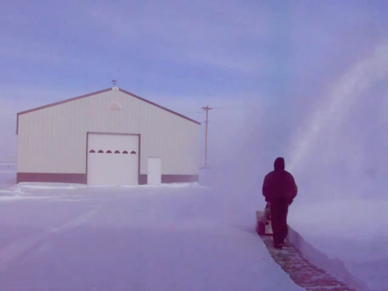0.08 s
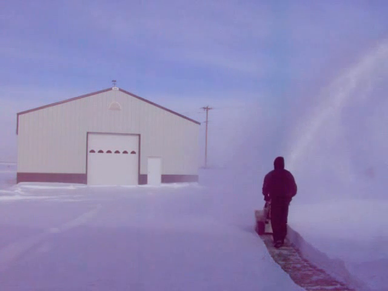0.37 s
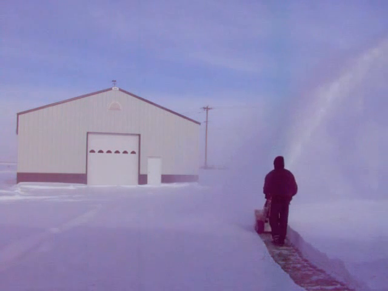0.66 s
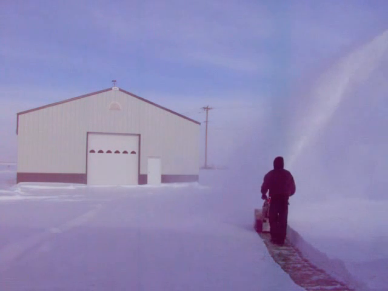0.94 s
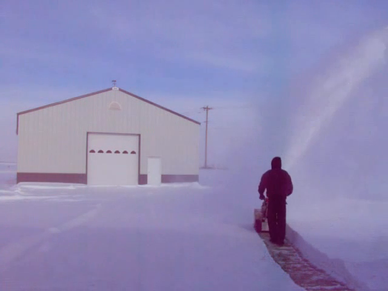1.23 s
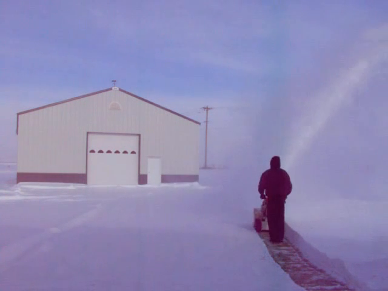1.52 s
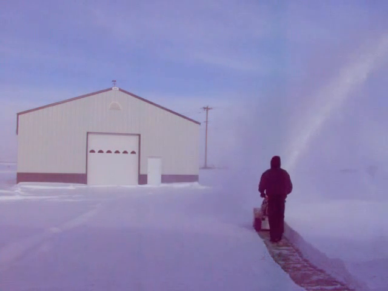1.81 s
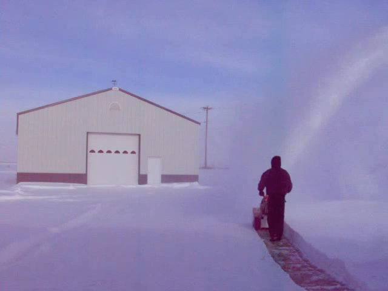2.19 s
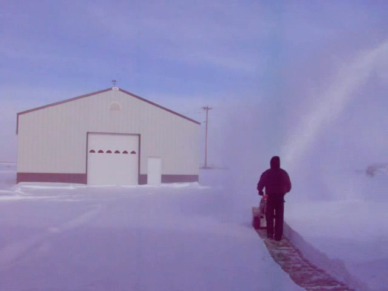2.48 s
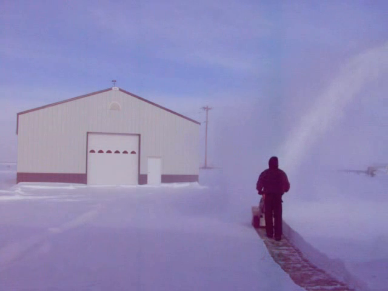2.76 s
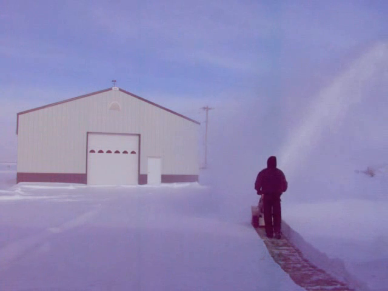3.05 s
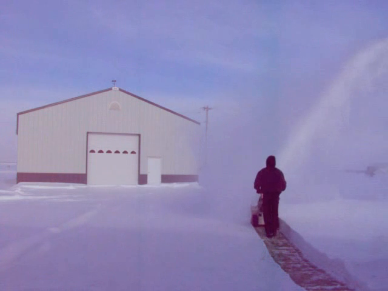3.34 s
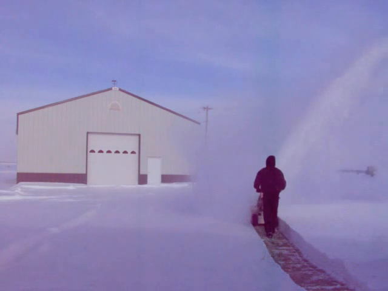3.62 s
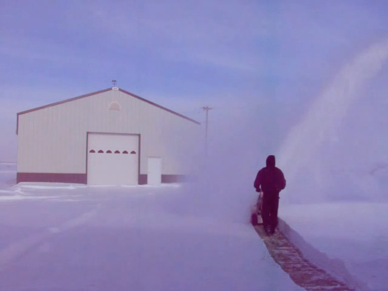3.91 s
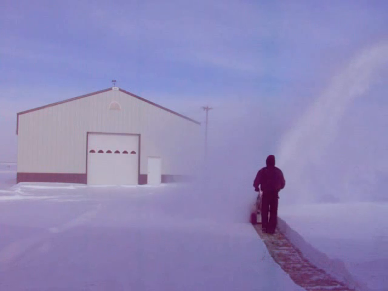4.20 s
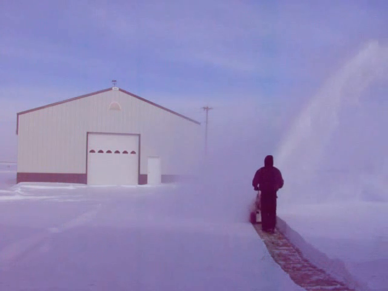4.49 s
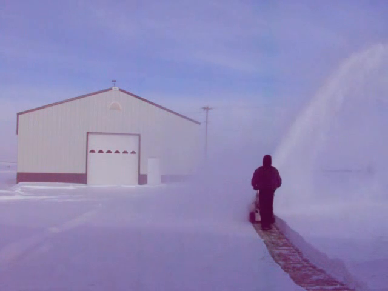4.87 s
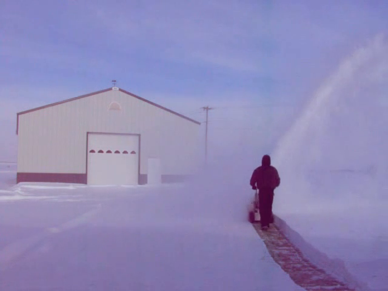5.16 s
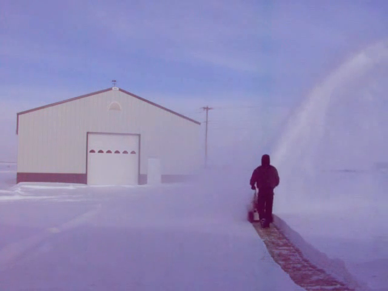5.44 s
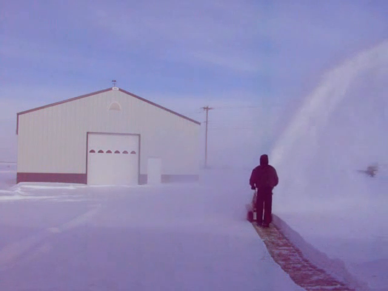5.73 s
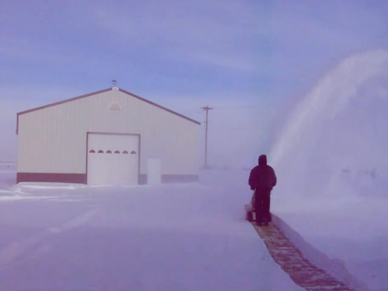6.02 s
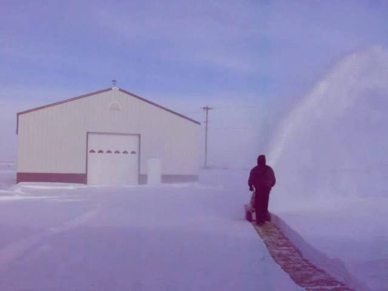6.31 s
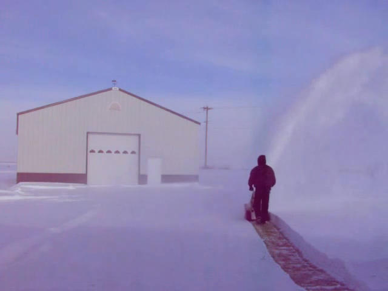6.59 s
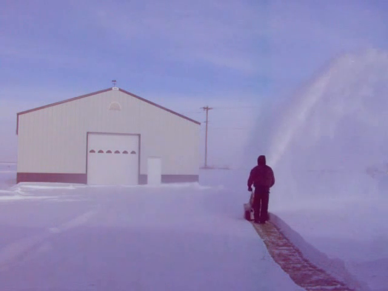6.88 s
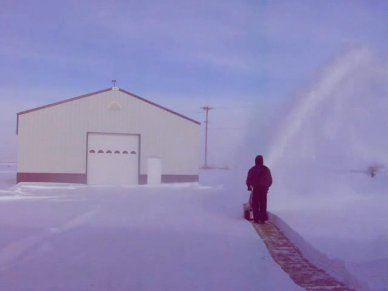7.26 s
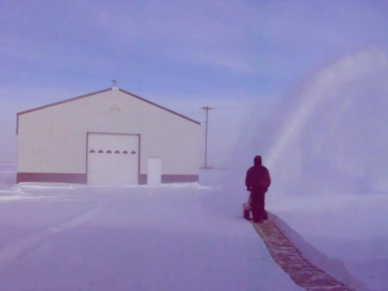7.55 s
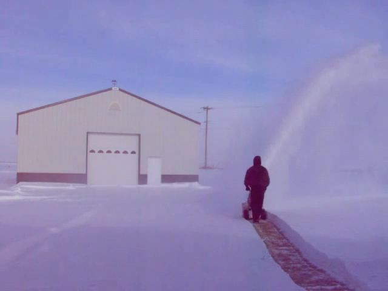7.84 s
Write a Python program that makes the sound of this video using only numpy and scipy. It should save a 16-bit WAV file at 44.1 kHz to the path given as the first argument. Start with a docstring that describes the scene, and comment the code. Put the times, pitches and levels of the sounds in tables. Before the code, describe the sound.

Outdoors, a snowblower works steadily through snow, heard from a fixed spot a little way behind it. The engine throbs fast and evenly, each beat spitting a bright, whistling rasp, with ticking valves and a humming housing underneath. A broad rush of thrown snow fills the sound, dipping twice as the load lightens, once early and once late. A nearby steel barn returns a faint, quick echo.

```python
"""Snowblower crossing a yard

A single-cylinder four-stroke snowblower works its way towards a steel barn. Each firing thumps the
muffler and spits a whistling rasp of gas. Fan and snow roar, valves knock, block and impeller hum.
The gas and the roar also bounce off the packed snow and come back late from the barn front."""
import sys
import numpy as np
from scipy import signal
from scipy.fft import rfft, irfft
from scipy.io import wavfile
from scipy.ndimage import map_coordinates

SR = 44100
rng = np.random.default_rng(int(sys.argv[2]) if len(sys.argv) > 2 else 0)


def log_audio(samples):
    """Write samples as a 16-bit WAV file to the path given in sys.argv[1]."""
    # one column per channel
    frames = np.atleast_2d(samples).T
    # limit to full scale, then quantise
    limited = np.clip(frames, -1, 1)
    pcm = np.round(limited * 32767).astype(np.int16)
    wavfile.write(sys.argv[1], SR, pcm)


N = 355887
T = np.arange(N) / SR


# Governed engine speed: (time [s], firing rate [Hz])
ENGINE_SPEED = [(0.0, 28.43), (0.36, 27.92), (1.97, 28.23), (2.15, 27.99), (2.87, 28.22), (3.77, 27.88),
                (3.95, 28.58), (4.12, 27.36), (4.3, 28.4), (4.66, 27.58), (5.02, 28.28), (5.2, 27.51),
                (5.38, 28.01), (5.74, 27.65), (6.81, 27.6), (6.99, 27.82), (7.35, 27.41), (8.07, 27.61)]

def crankshaft(first_firing_s=.0195, wobble_s=.00007):
    """The slightly wobbling engine clock: cycles turned, and seconds since the exhaust valve opened."""
    firing_hz, = curves(ENGINE_SPEED)
    cycle = np.cumsum(firing_hz) / SR - first_firing_s * firing_hz[0]
    cycle += wobble_s * firing_hz * walk(4.2)
    return cycle, cycle % 1 / firing_hz


# Boomy tone of the muffler: (frequency [Hz], relative level [dB])
MUFFLER_EQ = [(28, -26.5), (56, -4), (84, -14), (112, 0), (140, 3), (168, -4), (196, -20.5), (224, -28.5),
              (340, -19), (420, -32), (900, -36.5), (2500, -73.5)]

def thump(cycle, burn_db):
    """Each exhaust pulse rings the muffler for a few low swings; whistling burns thump less."""
    kicks = pulses(cycle, angle=.061, scatter_db=.8, jitter_s=.00013) * undb(-.22 * burn_db)
    return unit(colour(np.mean(kicks) - kicks, MUFFLER_EQ))


def puff(age, rise_s, hold_s, decay_s, tail_db, tail_s):
    """Gas envelope after the valve opens: a sudden blow-down, then the piston pushes out the rest."""
    opening = 1 - np.exp(-(age / rise_s) ** 2)
    blow_down = np.exp(-np.maximum(age - hold_s, 0) / decay_s)
    tail = undb(tail_db) * np.exp(-age / tail_s)
    return opening * (blow_down + tail)


# Bright hiss of gas leaving the muffler: (frequency [Hz], relative level [dB])
GAS_EQ = [(200, -20.5), (900, -13.5), (2000, -9), (3250, -5), (3600, -3), (4100, 0.5), (4700, -2),
          (5300, -6), (6200, -8), (7000, -14), (7700, -17.5), (8200, -21)]

def rasp(cycle, age, load_db, scatter_db=1.2):
    """A burst of turbulent gas at every firing; load leaves more to push out and fattens the tail."""
    flow = puff(age, rise_s=.0015, hold_s=.0019, decay_s=.0028, tail_db=-9 + .73 * load_db, tail_s=.021)
    return unit(colour(noise() * flow * undb(scatter_db * per_firing(cycle)), GAS_EQ))


# Weak burns that make the muffler outlet ring out: (time [s], whistle accent [dB])
WEAK_BURNS = [(0.49, 4), (0.52, 4), (0.98, 7.5), (1.02, 6), (1.3, 5.5), (2.08, 5.5), (2.19, 5.5), (4.29, 8),
              (4.62, 4.5), (5.4, 6), (6.05, 6.5), (6.38, 5.5), (6.45, 5), (6.49, 3.5), (6.67, 5.5),
              (6.74, 2.5), (6.85, 1.5), (6.96, 2), (7.17, 1.5), (7.5, 4.5), (7.69, 4), (7.9, 4.5),
              (8.01, 4.5)]

def burns(cycle, scatter_db=2):
    """Whistle accent in dB, held through each cycle: set for weak burns, random for the rest."""
    times, weak_db = np.transpose(WEAK_BURNS)
    accent_db = scatter_db * rng.standard_normal(512)
    weak_cycles = np.round(np.interp(times, T, cycle)).astype(int)
    accent_db[weak_cycles + 1] = weak_db
    return accent_db[np.floor(cycle).astype(int) + 1]


# Higher modes of the muffler outlet: (ratio to the lowest mode, relative level [dB])
OUTLET_OVERTONES = [(1.101, -9), (1.265, -17)]

def whistle(cycle, age, burn_db, pitch_hz=3570, rise_hz_per_s=22, scatter_hz=55, width_hz=140, purity=3):
    """The gas jet makes the outlet chirp; its lowest mode sings, the higher ones only flutter."""
    hz = pitch_hz + rise_hz_per_s * T + scatter_hz * per_firing(cycle)
    phase = 2 * np.pi * np.cumsum(hz) / SR
    tone = unit((purity + walk(width_hz)) * np.cos(phase) + walk(width_hz) * np.sin(phase))
    for ratio, db in OUTLET_OVERTONES:
        tone += undb(db) * unit(walk(width_hz) * np.cos(ratio * phase))
    flow = puff(age, rise_s=.0016, hold_s=.0033, decay_s=.0014, tail_db=-15, tail_s=.02)
    return unit(tone * flow * undb(burn_db))


# Broad wash of fan and flying snow: (frequency [Hz], relative level [dB])
RUSH_EQ = [(25, -21), (80, -10.5), (200, -4.5), (300, -12.5), (480, -13), (780, -9), (1350, -8),
           (1850, -5.5), (2900, -7.5), (3350, -0.5), (3750, 1.8), (4100, 0), (4800, -8), (6000, -18),
           (7500, -24), (8200, -42.5)]

def rush(flutter_db=1.16):
    """The cooling fan and the stream of snow from the chute make a fluttering roar."""
    return unit(colour(noise() * undb(flutter_db * walk(17)), RUSH_EQ))


# Ring of engine covers and impeller housing: (frequency [Hz], bandwidth [Hz], relative level [dB])
HOUSING_MODES = [(591, 81, -7), (671, 25, -11), (764, 32, -1.5), (815, 54, -7), (920, 84, -8.5),
                 (1084, 60, 0.5), (1600, 50, 7.5), (2121, 122, 5), (2572, 160, 2), (3030, 88, -9.5)]

def housing(x):
    """Covers and housing ring at their resonances with whatever strikes them."""
    return sum(undb(db) * signal.lfilter(*signal.iirpeak(hz, hz / width, fs=SR), x)
               for hz, width, db in HOUSING_MODES)


def churn(flutter_db=1.5):
    """Snow tumbles unevenly through the impeller housing."""
    return unit(housing(noise() * undb(flutter_db * walk(16))))


# Knock pattern of one engine cycle: (delay after the exhaust opens [cycles], relative level [dB])
KNOCK_PATTERN = [(.05, -2), (.14, -2), (.37, -3.5), (.46, -5.5), (0.791, -5)]

def clatter(cycle):
    """Valves and piston knock at the same crank angles every cycle and ring the covers."""
    knocks = sum(undb(db) * pulses(cycle, angle, scatter_db=1.5, jitter_s=.00005)
                 for angle, db in KNOCK_PATTERN)
    dulled = colour(knocks, [(200, -4), (600, -1), (1100, .5), (3000, -14.5)])
    return unit(housing(dulled))


# Hum of the shaking block and covers: (multiple of the firing rate, relative level [dB])
BLOCK_HARMONICS = [(8, -46.5), (9, -54.5), (10, -50), (11, -52), (12, -49), (21, -51), (24, -46.5),
                   (27, -46.5), (30, -49), (33, -49.5), (39, -49), (57, -45)]

def drone(cycle, waver_db=3):
    """The shaking block hums at multiples of the firing rate, each swelling and fading on its own."""
    knots = np.linspace(0, T[-1], 40)
    hum = 0
    for multiple, db in BLOCK_HARMONICS:
        swell = np.interp(T, knots, undb(db + waver_db * rng.standard_normal(len(knots))))
        hum += swell * np.sqrt(2) * np.sin(2 * np.pi * (multiple * cycle + rng.random()))
    return hum


# Hum of the impeller: (multiple of the blade rate, level [dB])
BLADE_HARMONICS = [(1, -54), (2, -41.5), (5, -51)]

def impeller(cycle, blades_per_firing=2.675, slip=.04):
    """The blades hum out of step with the engine and beat against its thump; the belt slips a little."""
    blades = blades_per_firing * cycle + slip * walk(2)
    return sum(undb(db) * np.sqrt(2) * np.sin(2 * np.pi * multiple * blades)
               for multiple, db in BLADE_HARMONICS)


def ground_bounce(gas, spray, lag_s=.00199, closing_s_per_s=.00001):
    """Packed snow mirrors the small muffler outlet cleanly, the wide spray only faintly."""
    return delay(undb(-9) * gas + undb(-16) * spray, lag_s - closing_s_per_s * T)


def barn_echo(gas, spray, lag_s=.132, closing_s_per_s=.0023, smear_s=.0036):
    """The ribbed barn front returns a smeared slapback that tightens as the machine draws nearer."""
    thrown = undb(-11) * gas + undb(-8.5) * spray
    dulled = colour(thrown, [(4200, 1), (6000, -2.7)])  # the long way through blowing snow
    ribs = rng.standard_normal(2048) * np.exp(-T[:2048] / smear_s)
    smeared = signal.fftconvolve(dulled, ribs / np.linalg.norm(ribs))[:N]
    return delay(smeared, lag_s - closing_s_per_s * T)


def undb(db):
    """Decibels to gain."""
    return 10 ** (np.asarray(db) / 20)


def unit(x):
    """Scale to rms 1."""
    return x / np.sqrt(np.mean(x ** 2))


def curves(table):
    """Automation curves: each column after the time as one value per sample."""
    times, *columns = np.transpose(table)
    return [np.interp(T, times, column) for column in columns]


def noise():
    """White noise."""
    return rng.standard_normal(N)


def walk(rate_hz):
    """Smooth random drift with rms 1, rolled off above rate_hz."""
    return unit(signal.sosfilt(signal.butter(2, rate_hz, fs=SR, output="sos"), noise()))


def colour(x, points, size=8192):
    """Minimum-phase EQ through (frequency [Hz], gain [dB]) points."""
    hz, db = np.transpose(points)
    bins = np.maximum(np.fft.rfftfreq(size, 1 / SR), 1)
    gain = undb(np.interp(np.log(bins), np.log(hz), db))
    cepstrum = irfft(np.log(gain))
    cepstrum[1:size // 2] *= 2
    cepstrum[size // 2 + 1:] = 0
    impulse = irfft(np.exp(rfft(cepstrum)))
    return signal.fftconvolve(x, impulse)[:N]


def delay(x, seconds):
    """The sound after a path of changing length."""
    return map_coordinates(x, [(T - seconds) * SR], order=3, mode="mirror")


def pulses(cycle, angle, scatter_db, jitter_s):
    """One click per engine cycle, `angle` cycles in, each a little different in size and time."""
    cycles = np.arange(int(cycle[-1]) + 1)
    timing, size = rng.standard_normal((256, 2))[cycles].T
    times = np.interp(cycles + angle, cycle, T, right=2 * T[-1]) + jitter_s * timing
    samples = (np.maximum(times, 0) * SR).astype(int)
    return np.bincount(samples, undb(scatter_db * size), N)[:N]


def per_firing(cycle):
    """A random value held for each engine cycle."""
    return rng.standard_normal(512)[np.floor(cycle).astype(int) + 1]


# How hard the auger makes the engine work: (time [s], load relative to the usual [dB])
AUGER_LOAD = [(0.0, -1), (0.42, 0), (0.52, -4.5), (0.73, -0.45), (1.99, 1.7), (2.85, -0.3), (3.04, 1.7),
              (3.77, 1.5), (3.88, -1.1), (4.19, 1.1), (4.3, -1), (4.93, 0.7), (5.14, 2), (5.7, -0.4),
              (6.6, -1), (6.8, -5.5), (7.15, -3.5), (7.85, -0.5)]

def scene():
    """One crankshaft times the engine; thump and roar swell with the load while the whistle fades."""
    cycle, age = crankshaft()
    load_db, = curves(AUGER_LOAD)
    burn_db = burns(cycle)
    gas = undb(-24.9 + .1 * load_db) * rasp(cycle, age, load_db)
    gas += undb(-28.5 - .75 * load_db + .4 * T) * whistle(cycle, age, burn_db)  # creeps up in level
    spray = undb(-22 + load_db - .13 * T) * rush()  # fades as the machine moves away
    body = undb(.84 * load_db) * (undb(-32.5) * clatter(cycle) + undb(-27.5) * churn())
    hum = undb(-1.1 + .65 * load_db) * drone(cycle) + impeller(cycle)
    throb = undb(-26 + load_db) * thump(cycle, burn_db)
    reflections = ground_bounce(gas, spray) + barn_echo(gas, spray)
    return (throb + gas + spray + body + hum + reflections)[None]


def record(dry, ceiling=.8, top_hz=8020):
    """Soft clipping rounds the loudest peaks; a steep low-pass takes off the top end."""
    rounded = dry / (1 + (dry / ceiling) ** 6) ** (1 / 6)
    return signal.sosfilt(signal.cheby1(14, .3, top_hz, fs=SR, output="sos"), rounded)


dry = scene()
out = record(dry)
log_audio(out)
```